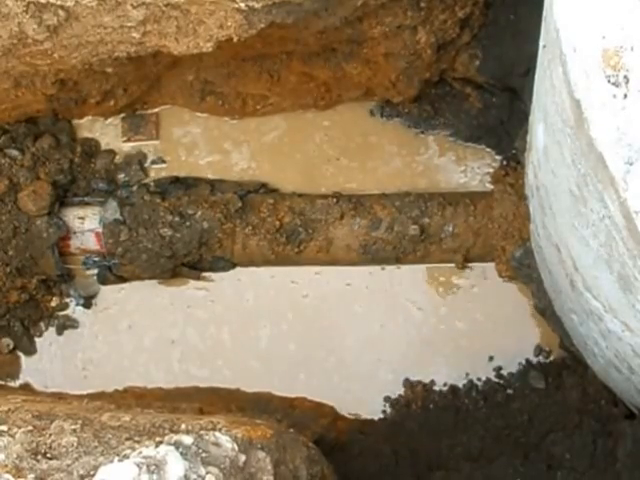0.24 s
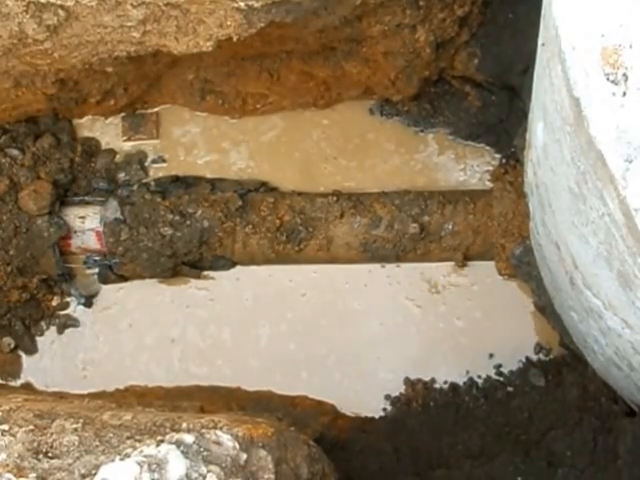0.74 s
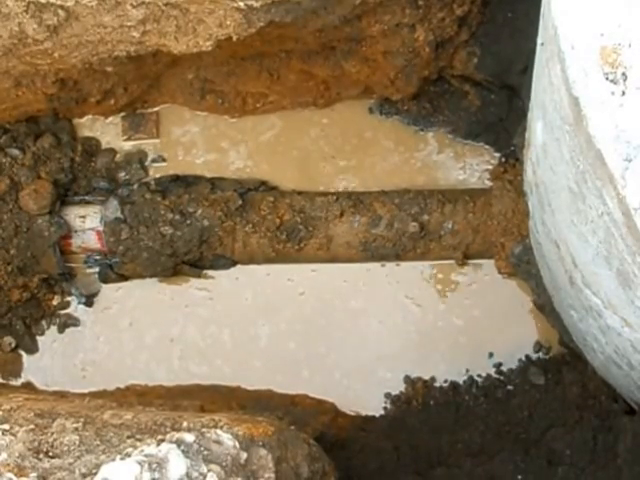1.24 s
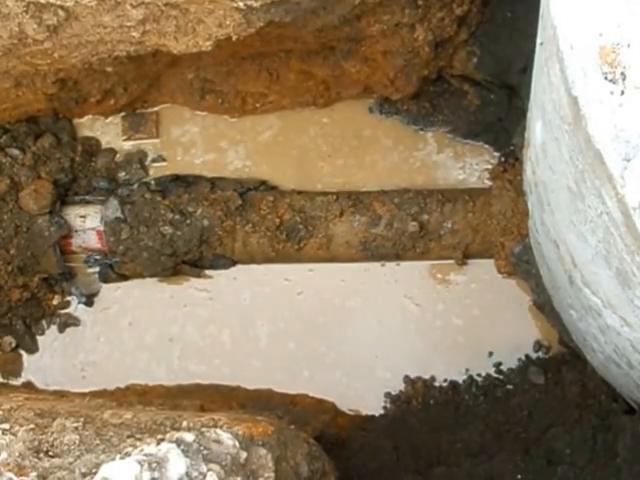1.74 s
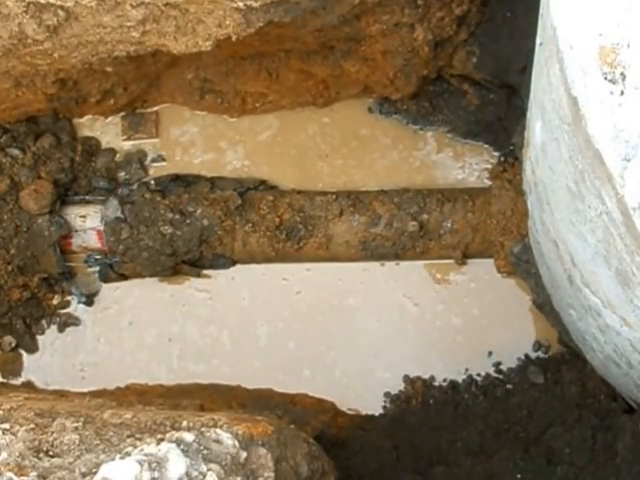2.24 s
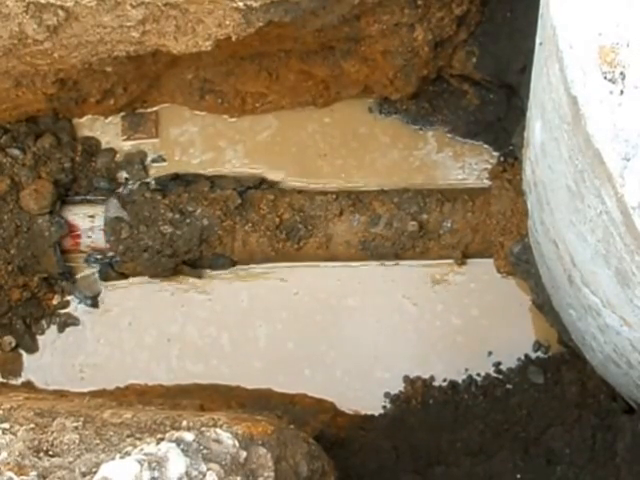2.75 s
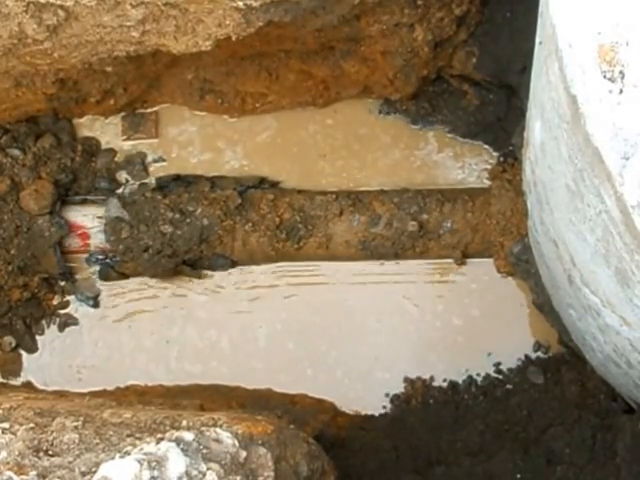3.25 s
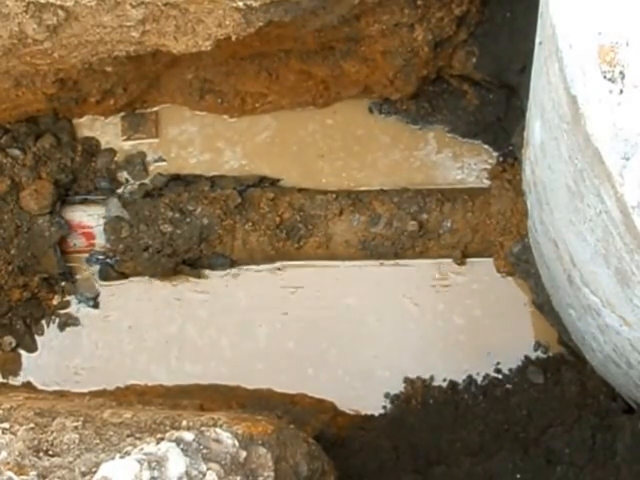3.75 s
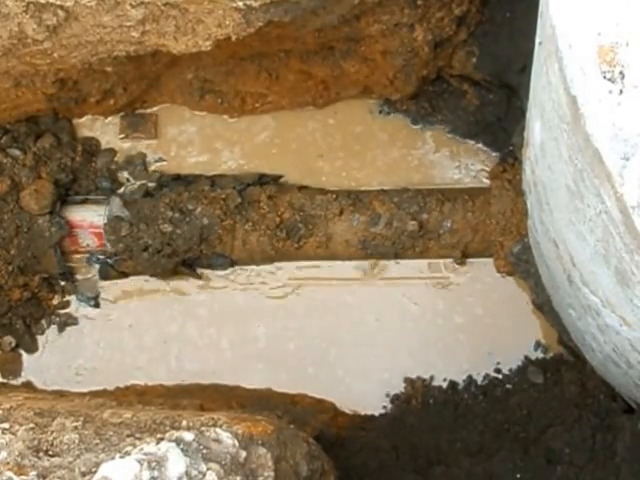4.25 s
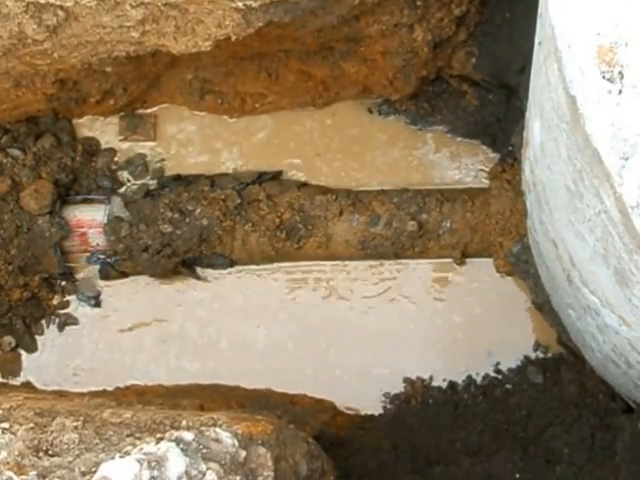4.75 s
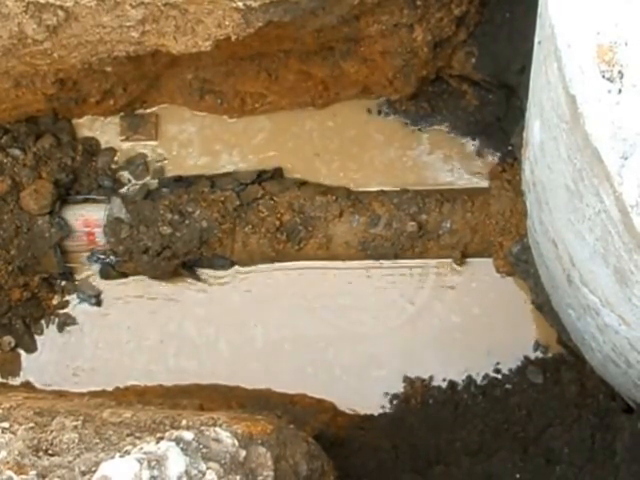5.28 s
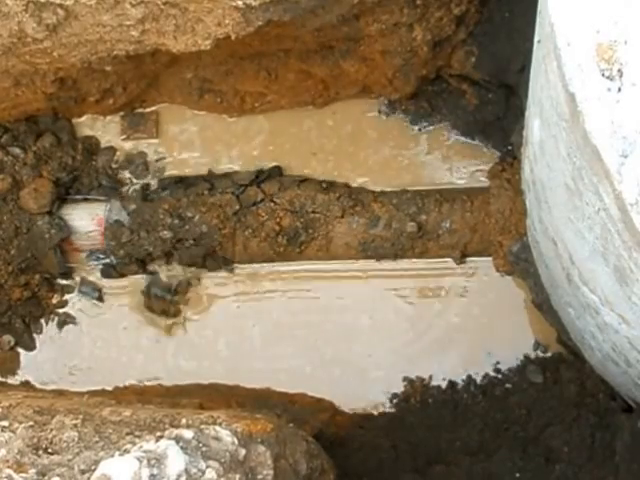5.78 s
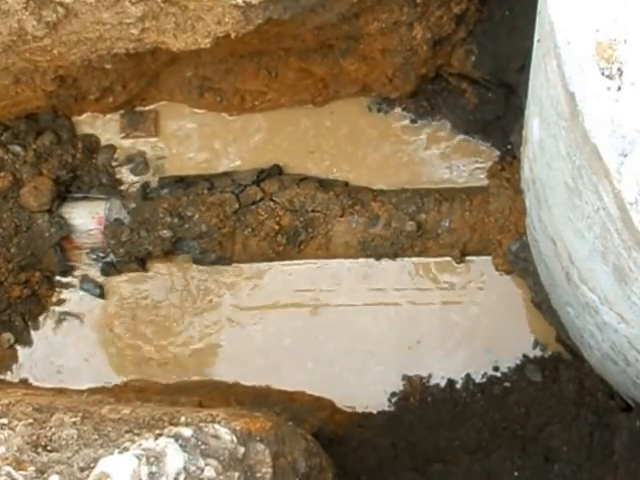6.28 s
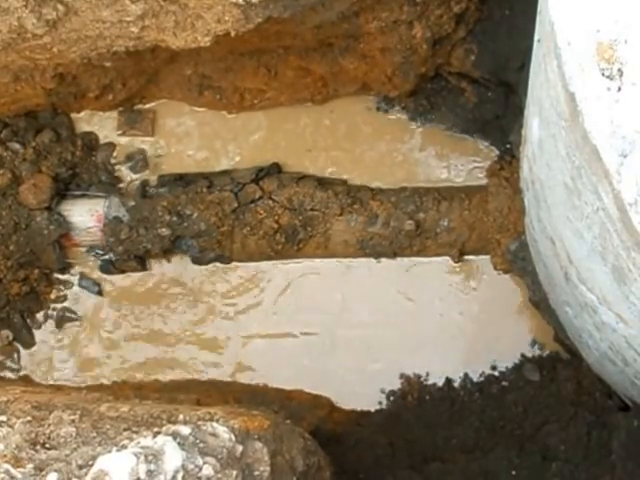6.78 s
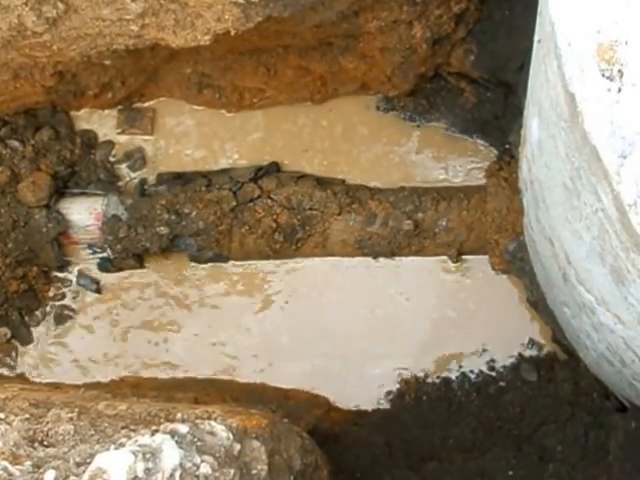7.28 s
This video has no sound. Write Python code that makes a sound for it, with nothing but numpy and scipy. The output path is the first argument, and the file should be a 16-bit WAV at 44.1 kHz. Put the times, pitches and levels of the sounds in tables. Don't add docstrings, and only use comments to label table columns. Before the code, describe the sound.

A diesel power pack drones throughout, a low buzzing hum near 50 firings a second with rough exhaust and steady fan hiss, its pitch sagging slightly under load. For the first 2.2 seconds it is nearly alone, with thin valve hisses and tiny ticks near 1.0, 1.15 and 1.7. A dull shift and crumbling lead to a huge sharp double crack with a deep thump at 2.7. Smaller snaps and grinding follow from 3.1, thickening to a hard crack at 4.03 and another at 4.57. Irregular breaks continue at 5.0, 5.4 and 5.52, then a dense cluster from 5.6 to 5.9. Light chips click until 6.2, soft crunches and a thud come around 6.5, and a watery knock with valve puffs at 7.15. Close, dry trench sound with faint earth-wall echoes; the engine dips after loud breaks and creeps back.

```python
import sys
import numpy as np
from scipy import signal
from scipy.fft import rfft, irfft, next_fast_len
from scipy.io import wavfile
from scipy.ndimage import uniform_filter1d, map_coordinates

SR = 44100
rng = np.random.default_rng(int(sys.argv[2]) if len(sys.argv) > 2 else 0)


def convert_level_to_amplitude(level_db):
    exponent = np.asarray(level_db, float) / 20
    return 10 ** exponent


def unload_audio(sound):
    columns = np.transpose(np.atleast_2d(sound))
    steps = np.round(np.clip(columns, -1, 1) * 32767)
    wavfile.write(sys.argv[1], SR, steps.astype(np.int16))


N = 331660

# frequency in Hz, level in dB.
SNAP_SPECTRUM = [(500, -23.5), (1000, -19), (1600, 11), (2200, 2.5), (2800, 5), (3400, 6), (4000, 2),
                 (5200, 5), (6500, 0.5), (8000, -5.5), (9000, -29.5)]
# start in seconds, peak in dB, bore thud in dB over the peak,
# wall knock in dB over the peak, t60 in seconds.
MAIN_BREAKS = [(2.6762, -5.5, -6, -5, 0.094), (2.7048, -.5, -8, -3, 0.033),
               (3.1488, -21.5, -4.5, -16, 0.042), (3.3977, -16.5, -2, -17, 0.089),
               (3.616, -19.5, -16, 1, 0.035), (3.704, -15.5, -13.5, -29, 0.068),
               (3.732, -11.5, -7.5, -5.5, 0.055), (5.8703, -10, -17, -33, 0.075),
               (3.9049, -15, 4.5, -14, 0.063), (3.934, -11.5, -4, -8, 0.042), (4.0297, -.5, -5.5, -5, 0.01),
               (4.5342, -22, -21, -12, 0.049), (4.566, 2.5, -15, -7, 0.049),
               (4.8098, -9.5, -10.5, -6.5, 0.037), (4.8999, -13, -15.5, -4, 0.043),
               (4.9978, -14.5, -5.5, -13.5, 0.054), (5.375, -11.5, 0, 2.5, 0.047),
               (5.5173, -3.5, -10, -1, 0.03), (5.6398, -11, -1.5, -5, 0.044),
               (5.7086, -14.5, 3, -6.5, 0.065), (5.7501, -12, -16, -3, 0.044),
               (5.7924, -15, -8.5, -6, 0.13), (5.8269, -15, -5.5, -19, 0.076), (5.8412, -3, -7, -6, 0.046)]


def unit(x):
    return x / np.sqrt(np.mean(x ** 2) + 1e-20)


def along(points, hz):
    f, value = np.transpose(points)
    return np.interp(np.log(hz + 1), np.log(f + 1), value)


def wobble(rate):
    knots = rng.standard_normal(int(N * rate / SR) + 4)
    return map_coordinates(knots, [np.arange(N) * rate / SR])


def filtered(x, response):
    length = x.shape[-1]
    m = next_fast_len(length + 8192)
    return irfft(rfft(x, m) * response(np.fft.rfftfreq(m, 1 / SR)), m)[..., :length]


def resonant(modes):
    def response(f):
        return sum((-1) ** k * convert_level_to_amplitude(db) * 1j * f * width / (hz * hz - f * f + 1j * f * width)
                   for k, (hz, width, db) in enumerate(modes))
    return response


def rush(spectrum, patchy_db):
    z = signal.stft(rng.standard_normal(N), nperseg=512)[2]
    field = uniform_filter1d(rng.standard_normal(z.shape), size=6, axis=0)
    field = uniform_filter1d(field, size=10, axis=1)
    noise = signal.istft(z * convert_level_to_amplitude(patchy_db * unit(field)), nperseg=512)[1][:N]
    return unit(filtered(noise, lambda hz: convert_level_to_amplitude(along(spectrum, hz))))


def add(track, s, sound):
    part = track[max(round(s * SR), 0):][:len(sound)]
    part += sound[:len(part)]


def ducking():
    from_db, per_db, most_db = -6.5, 1.22, 24
    in_s, out_s = 0.064, 0.74
    t = np.arange(N) / SR
    need = np.zeros(N)
    for s, db, *_ in MAIN_BREAKS:
        after = np.maximum(t - s, 0)
        need += per_db * max(db - from_db, 0) * np.exp(-after / out_s) * (1 - np.exp(-after / in_s))
    return -most_db * np.tanh(need / most_db)


def engine():
    # time in seconds, firing rate in Hz.
    speed = [(0, 48.1), (0.379, 47.74), (.55, 51.81), (.8, 52.17), (0.919, 50.83), (1.722, 50.35),
             (2.069, 46.88), (2.343, 46.82), (2.489, 50.7), (2.911, 49.89), (5.901, 49.9), (6.053, 47.94),
             (6.259, 44.22), (6.492, 50.1), (6.76, 51.6), (7.138, 50.14), (7.33, 44.4), (7.52, 44.9)]
    # centre in Hz,
    # offset in Hz for the first dB lost, steepness (exponent), top level in dB.
    silencer = [(94.45, 3, 2.1, -39.5), (132.5, 7, 2.18, -41), (204, 10.5, 4, -37.5)]
    # multiple of the firing rate, level in dB, gain in dB per dB of load.
    weak_orders = [(1, -55.5, -4), (5, -57.5, -0.7), (6, -50, -2.5), (7, -54, 0), (8, -52.5, -3.1),
                   (9, -62.5, 0.7), (10, -53.5, 3.5), (11, -61, 5.5), (12, -54.5, 0.8)]
    # frequency in Hz, level in dB per Hz.
    roar_spectrum = [(15, -31.5), (25, -13.5), (49, -29.5), (108, -8.5), (151, -12.5), (195, -6.5),
                     (253, -7.5), (437, -11.5), (493, -8.5), (659, -15.5), (852, -14), (1500, -23),
                     (1950, -27.5), (3300, -120)]
    # frequency in Hz, level in dB per Hz.
    hiss_spectrum = [(650, -30.5), (1100, -4.5), (1720, -8), (1900, 0), (2530, -7), (2750, -4.5),
                     (4060, -10), (4370, -7.5), (6240, -10), (7610, -11.5), (7930, -4), (10300, -45.5),
                     (17400, -120)]
    unloaded_hz, load_db_per_hz = 51.46, 0.2971

    firing_hz = np.interp(np.arange(N) / SR, *np.transpose(speed))
    duck_db = ducking()
    load_db = load_db_per_hz * (unloaded_hz - firing_hz)
    roar_db = -38.5 + load_db + duck_db
    hiss_db = -49 + 0.5 * load_db + 0.25 * duck_db
    phase = 2 * np.pi * np.cumsum(firing_hz) / SR

    def tone(order, db):
        level = np.sqrt(2) * convert_level_to_amplitude(db + 0.35 * wobble(23))
        return level * np.sin(order * phase + 0.13 * wobble(17) + rng.uniform(0, 6.18))

    lines = np.zeros(N)
    for order, (hz, width_hz, steepness, db) in enumerate(silencer, start=2):
        loss_db = np.abs((order * firing_hz - hz) / width_hz) ** steepness
        lines += tone(order, db + duck_db - loss_db)
    for order, db, grows in weak_orders:
        lines += tone(order, db + roar_db + 39 + grows * load_db)

    throb = np.cos(phase)
    roar = convert_level_to_amplitude(roar_db + 0.39 * throb + 0.6 * wobble(8)) * rush(roar_spectrum, patchy_db=-1.23)
    hiss = convert_level_to_amplitude(hiss_db + 2.13 + 0.31 * throb + 0.52 * wobble(12)) * rush(hiss_spectrum, patchy_db=0.6)
    return lines + roar + hiss


def leaks():
    # start in seconds, length in seconds, frequency in Hz, width in Hz, level in dB.
    hisses = [
        (.04, .3, 4600, 250, -56),
        (.975, .035, 4600, 350, -54),
        (.98, .03, 2750, 200, -52),
        (1.53, .12, 4600, 250, -54),
        (2.17, .1, 6600, 600, -57),
        (7.08, .05, 6400, 700, -57),
        (7.1, .16, 4500, 300, -60),
        (7.19, .07, 1200, 200, -46),
        (7.24, .045, 6500, 900, -54),
    ]
    out = np.zeros(N)
    for s, length, hz, width_hz, db in hisses:
        swell = np.hanning(round(length * SR * 1.4)) ** 0.5
        narrow = lambda f: resonant([(hz, width_hz, 0)])(f) ** 2
        add(out, s, convert_level_to_amplitude(db) * swell * unit(filtered(rng.standard_normal(len(swell)), narrow)))
    return out


def rings(table, glide, attack):
    out, t = np.zeros(N), np.arange(SR // 4) / SR
    for s, db, hz, t60 in table:
        envelope = convert_level_to_amplitude(db - 60 * t / max(t60, 0.003)) * (1 - np.exp(-t / attack))
        add(out, s, envelope * np.sin(2 * np.pi * hz * (t + glide * t * t)))
    return out


def whips():
    # start in seconds, peak in dB, frequency in Hz, t60 in seconds.
    instants = [(.988, -40, 2800, .03), (.999, -34.5, 4600, 0.022), (1.012, -39.5, 2750, 0.035),
                (1.151, -34, 3400, 0.021), (1.1565, -23, 6980, 0.0055), (1.1566, -27, 5600, 0.0054),
                (1.1565, -25, 4260, .006), (1.157, -30, 2280, .008), (2.705, -6.5, 3400, 0.011),
                (3.704, -27, 3300, .02), (2.7053, -5, 800, .014), (2.7068, -7, 620, .03),
                (2.7063, -5, 5200, .006), (2.735, -20, 3500, .012), (2.7355, -23, 5500, .01),
                (4.5355, -20, 4900, .012), (4.5048, -24, 5400, .01), (4.5685, -8, 1600, .012),
                (5.517, -12, 3500, .007), (3.733, -22, 1950, 0.032), (4.0297, -1, 720, 0.007),
                (4.0298, -5.5, 5000, 0.0069), (4.0298, -14, 3100, 0.0059), (4.5662, -5, 2300, 0.008),
                (4.5664, -10.5, 5500, .01), (4.5718, -11.5, 800, 0.017), (5.8412, -9, 3300, .008),
                (5.8414, -6.5, 6000, 0.0041), (5.8432, -8, 600, 0.02)]
    return rings(instants, glide=0.1, attack=0.00015)


def cracks():
    # start in seconds, peak in dB,
    # wall knock in dB over the peak, brightest frequency in Hz.
    splits = [(2.617, -24, -4, 3250), (2.702, -12, -11.5, 5900), (2.7416, -12, -20, 5650),
              (2.788, -32.5, -20, 5040), (2.824, -22.5, -13.5, 1870), (2.9223, -24.5, -25, 4220),
              (3.1174, -19.5, -2.5, 2150), (3.1838, -25, -8, 2290), (3.2322, -25.5, -19, 3080),
              (3.249, -22.5, -4, 2900), (3.495, -25, -3, 2230), (4.1382, -28.5, -22, 1910),
              (4.29, -34.5, -8.5, 6000), (4.31, -32, -18, 4420), (4.365, -28.5, -12, 2010),
              (4.5048, -20.5, -8.5, 2030), (5.0754, -28, -22, 5400), (5.1591, -25.5, 2, 1690),
              (5.254, -24, -6, 5030), (5.4403, -29.5, 3, 1650), (5.922, -22.5, -11.5, 3700),
              (6.0484, -28, -19, 1985), (6.2832, -29, -23, 4600), (6.351, -35, 0.5, 5030),
              (6.442, -26, 1.5, 2050), (6.4996, -33, 5.5, 2560), (6.5236, -29.5, 7, 3160)]
    # start in seconds, peak in dB, brightest frequency in Hz.
    flakes = [(0.998, -31, 4580), (1.157, -30.5, 3700), (1.6978, -27, 2780), (2.5397, -26, 2849),
              (3, -28, 3330), (3.4686, -24, 3460), (3.523, -22, 3700), (3.5797, -20, 1970),
              (3.6766, -29, 1630), (3.8175, -21.5, 1630), (4.2211, -26, 4445), (4.4314, -22, 2055),
              (4.4622, -22.5, 5900), (4.7104, -29, 2009), (4.8762, -21.5, 5050), (5.041, -20, 5360),
              (5.0977, -23.5, 2750), (5.2738, -25, 1917), (6.462, -23.5, 6400), (5.6203, -17.5, 2170),
              (3.8762, -23.5, 5400), (5.945, -23.5, 5400), (6.0048, -19.5, 3063), (6.024, -16.5, 4404),
              (6.0727, -25, 5370), (6.1028, -20.5, 6930), (6.133, -24.5, 4470), (6.1782, -30, 5540),
              (6.2233, -33, 3030), (6.594, -27, 6530)]
    events = [(*row, 2260) for row in MAIN_BREAKS]
    events += [(s, db, -3, knock_db, 0.059, hz) for s, db, knock_db, hz in splits]
    events += [(s, db, -23.5, -14, 0.063, hz) for s, db, hz in flakes]
    return events


def fractures():
    # frequency in Hz, width in Hz, level in dB.
    wall_modes = [(557, 180, -2), (922, 310, -0.5), (1200, 1060, -7.5)]
    # frequency in Hz, width in Hz, level in dB.
    bore_modes = [(200, 100, 2), (320, 87.5, 4), (490, 170, -6)]
    rise_s, rise_slows = 0.0002, 0.65
    front, front_grows, front_t60 = 1.8, 0.23, 0.0063
    clump_db = 2.5
    out, t = np.zeros(N), np.arange(SR // 5) / SR
    crest = lambda x: x / np.abs(x).max()
    for s, db, thud_db, knock_db, t60, bright_hz in cracks():
        breaks = rng.standard_normal((3, len(t)))
        clumps = uniform_filter1d(rng.standard_normal((3, len(t))), size=60, axis=1)
        breaks = breaks * convert_level_to_amplitude(clump_db * unit(clumps))

        def shape(lag, slow, rise):
            late = np.maximum(t - lag, 0)
            return convert_level_to_amplitude(-60 * late / (slow * max(t60, 0.01))) * (1 - np.exp(-late / rise))

        def colour(f):
            return convert_level_to_amplitude(along(SNAP_SPECTRUM, f)) * (1 + resonant([(bright_hz, 0.2 * bright_hz, 4)])(f))

        snap = filtered(breaks[0], colour) * shape(0, 1, rise_s * convert_level_to_amplitude(-rise_slows * db))
        snap *= 1 + front * convert_level_to_amplitude(front_grows * db - 60 * t / front_t60)
        knock = filtered(breaks[1], resonant(wall_modes)) * shape(0.00071, 1.4, 0.0018)
        thud = filtered(breaks[2], resonant(bore_modes)) * shape(0.0013, 2.25, 0.0034)
        mix = crest(snap) + convert_level_to_amplitude(knock_db + 1.5) * crest(knock) + convert_level_to_amplitude(thud_db + 1.5) * crest(thud)
        add(out, s, convert_level_to_amplitude(db - 4) * mix)
    return out


def trench(x):
    lags, signs = rng.uniform(0.005, 0.041, 8), rng.choice([-1, 1], 8)
    echo = np.zeros(SR // 20)
    echo[(lags * SR).astype(int)] = signs * convert_level_to_amplitude(-250 * lags)
    return signal.fftconvolve(x, echo)[:N]


def grinding():
    # start in seconds, length in seconds,
    # grit in dB, body in dB.
    grinds = [(2.293, .07, -49.5, -32), (2.592, 0.16, -41, -49), (2.679, 0.014, -23.5, -14.5),
              (2.74, 0.015, -32, -33), (2.688, .01, -30, -26), (2.72, .018, -35, -28),
              (3.92, .018, -31, -30), (4.594, .014, -38, -32), (4.522, .02, -37, -38),
              (2.999, .014, -42, -40), (3.335, .025, -40, -38), (3.4, .02, -41, -40),
              (3.61, .015, -42, -38), (5.872, .016, -38, -36), (4.06, .014, -40, -36),
              (2.904, 0.067, -44.5, -37), (2.991, 0.041, -38.5, -30.5), (3.243, 0.027, -37.5, -32.5),
              (3.117, 0.024, -35.5, -31), (3.312, .045, -42, -33), (3.422, 0.017, -46.5, -30.5),
              (3.511, 0.018, -44.5, -30), (3.582, 0.044, -40.5, -36), (3.719, 0.028, -34.5, -31.5),
              (3.857, 0.055, -36.5, -37.5), (3.903, 0.045, -26.5, -28), (3.996, 0.048, -33, -30.5),
              (4.033, 0.042, -28, -22), (4.432, .018, -40, -41), (4.491, 0.062, -35.5, -32),
              (4.557, 0.046, -36, -26.5), (4.873, 0.023, -38.5, -35), (4.992, 0.034, -31.5, -28.5),
              (5.16, 0.02, -36.5, -38.5), (5.365, 0.072, -42, -39), (5.518, 0.042, -24, -25),
              (5.632, 0.039, -33, -34.5), (5.706, 0.041, -25.5, -24.5), (5.847, 0.042, -34, -25.5),
              (6.368, 0.08, -43, -44), (6.497, 0.081, -42.5, -34.5), (7.159, 0.054, -47.5, -29.5)]
    # start in seconds, length in seconds, grit in dB, body in dB.
    stroke = (3, 3, -49.5, -47.5)
    # frequency in Hz, level in dB.
    body_spectrum = [(110, -34), (190, 2), (330, 7.5), (600, -3.5), (1200, -9.5), (2000, -38.5)]
    slide_in, slide_out = 0.15, 0.48
    t = np.arange(N) / SR
    edge = lambda u: 0.5 + 0.5 * np.tanh(u)

    def slide(s, length, lag):
        start = edge((t - s - lag) / (slide_in * length))
        return start * edge((s + length + lag - t) / (slide_out * length))

    def crumbs(spectrum, lumpy_db):
        return unit(convert_level_to_amplitude(lumpy_db * wobble(260)) * rush(spectrum, patchy_db=1.4))

    grit, body = np.zeros(N), np.zeros(N)
    for s, length, grit_db, body_db in grinds + [stroke]:
        grit += convert_level_to_amplitude(grit_db) * slide(s, length, 0)
        body += convert_level_to_amplitude(body_db) * slide(s, length, 0.0047)
    return grit * crumbs(SNAP_SPECTRUM, lumpy_db=3.5) + body * crumbs(body_spectrum, lumpy_db=0.5)


def thumps():
    # start in seconds, peak in dB, frequency in Hz, t60 in seconds.
    shifts = [(2.309, -24, 429.5, 0.1), (2.704, 3.5, 221, 0.06), (2.7075, -2, 390, .05),
              (2.703, -8, 150, .09), (4.031, -10, 380, .04), (5.52, -10, 390, .06), (5.843, -9, 380, .04),
              (2.726, -15, 350, .05), (2.683, -15, 146, 0.05), (2.75, -7.5, 320, 0.045),
              (4.03, -15.5, 129, 0.2), (4.571, -15, 824, 0.025), (3.912, -12.5, 291, 0.12),
              (4.033, -4, 213.3, 0.096), (4.605, -19, 280, .06), (5.0, -4, 514, 0.017),
              (3.13, -21.5, 240, 0.13), (3.255, -22.5, 270, 0.095), (3.42, -19, 303.8, 0.072),
              (3.73, -15, 277, 0.076), (4.05, -14, 238, 0.16), (5.38, -12, 488, 0.076),
              (5.521, -15.5, 167, 0.36), (5.5175, -2, 235, 0.065), (5.378, -15, 250, .06),
              (4.608, -17, 350, .03), (2.694, -9, 300, .03), (5.715, -15, 300, .08),
              (5.548, -18, 340, 0.09), (5.895, -15, 185, 0.13), (5.8015, -18, 215, .13),
              (5.844, -3, 191, 0.1), (6.444, -25, 462, 0.073), (6.539, -13.5, 218, 0.12),
              (6.541, -15, 132, 0.098), (7.15, -14.5, 207, 0.055), (7.212, -15, 184, 0.077),
              (7.229, -17, 204, 0.048), (7.214, -24.5, 322, 0.11)]
    return rings(shifts, glide=-0.039, attack=0.0033)


def shards():
    # start in seconds, level in dB,
    # frequency in Hz, t60 in seconds.
    rattles = [(5.708, -22, 600, .1), (2.6765, -17, 6130, .04), (2.700, -10.5, 5340, 0.039),
               (2.7035, -10, 807, 0.02), (2.707, -14, 1820, 0.063), (2.734, -29.5, 3450, 0.041),
               (2.747, -19.5, 6270, 0.027), (3.147, -25, 3200, 0.033), (3.151, -28.5, 1810, 0.047),
               (3.4, -33.5, 2750, 0.11), (3.88, -22, 5280, 0.031), (3.91, -29, 6050, 0.036),
               (3.922, -26.5, 4430, 0.092), (3.927, -20, 1520, 0.077), (4.039, -18, 4530, 0.045),
               (4.066, -23, 1880, 0.052), (4.238, -39, 4470, 0.033), (4.287, -36, 850, 0.058),
               (4.29, -42, 5700, .04), (4.434, -30, 5460, 0.055), (4.455, -46.5, 4960, 0.025),
               (4.471, -34, 4800, 0.044), (4.523, -31, 1110, 0.071), (4.533, -27.5, 4700, 0.034),
               (5.138, -31, 800, 0.073), (4.63, -39, 650, .25), (4.67, -41, 786, .35),
               (5.018, -36, 5020, 0.043), (5.075, -37, 7000, 0.072), (5.187, -33.5, 900, 0.044),
               (5.28, -36, 1900, 0.089), (5.375, -20, 5100, 0.037), (5.378, -26, 843, 0.15),
               (5.401, -31, 4560, .06), (5.464, -35.5, 4530, .05), (5.5175, -12.5, 6000, 0.0099),
               (5.52, -27.5, 800, .1), (5.556, -21, 640, 0.1), (5.553, -32.5, 4560, 0.054),
               (5.641, -23, 604, 0.06), (5.841, -11.5, 770, 0.028), (5.846, -15, 1860, 0.067),
               (5.872, -22.5, 614, 0.13), (6.352, -47, 1200, 0.073), (6.39, -38, 940, 0.2),
               (6.455, -34, 750, .2), (6.53, -34, 890, 0.1), (6.522, -38, 2500, .2), (6.598, -35, 890, .15),
               (7.175, -38, 2200, .15),
               (5.709, -22, 3400, .04), (5.716, -25, 2700, .05), (5.751, -24, 3550, .045),
                 (5.868, -20, 620, .08), (4.598, -33, 5200, .04), (2.742, -17, 5600, .035),
                 (4.569, -14, 1100, .045), (5.519, -15, 600, .06), (6.49, -36, 1500, .2),
                 (3.93, -24, 2800, .05), (4.035, -29, 1500, .12), (2.745, -21, 620, .05),
                 (5.827, -24, 480, .05), (6.54, -27, 470, .07), (2.315, -32, 780, .12), (6.4, -35, 500, .3)]
    width_per_hz, rise_per_t60 = 0.41, 0.037
    out, t = np.zeros(N), np.arange(SR // 5) / SR
    for s, db, hz, t60 in rattles:
        t60 = max(t60, 0.01)
        narrow = lambda f: resonant([(hz, width_per_hz * hz, 0)])(f) ** 2
        shape = convert_level_to_amplitude(-60 * t / t60) * (1 - np.exp(-t / (rise_per_t60 * t60)))
        add(out, s, convert_level_to_amplitude(db) * shape * unit(filtered(rng.standard_normal(len(t)), narrow)))
    return out


def chips():
    # start in seconds, peak in dB, frequency in Hz, t60 in seconds.
    drops = [(3.9345, -7, 4820, 0.011), (3.935, -13, 5460, 0.013), (4.011, -11, 4870, 0.012),
             (4.997, -14, 5260, 0.011), (5.752, -18, 1200, 0.054), (5.753, -19, 1970, 0.035),
             (5.992, -39.5, 1365, 0.13), (6.048, -33, 1980, 0.044), (6.104, -16, 7500, 0.01),
             (6.223, -37, 3000, 0.038), (6.522, -31, 1014, 0.083), (7.157, -20, 1256, 0.093),
             (7.16, -17, 1294, 0.024), (7.173, -24.5, 1144, 0.091), (7.174, -28, 1533, 0.042),
             (7.174, -32, 3060, 0.036)]
    return rings(drops, glide=0.37, attack=0.00075)


def scene():
    pipe = fractures() + grinding() + thumps()
    pipe = filtered(pipe, lambda hz: (1j * hz / (90 + 1j * hz)) ** 2)
    pipe = pipe + convert_level_to_amplitude(-16.5) * trench(pipe)
    return (engine() + leaks() + whips() + pipe + shards() + chips())[None]


def band_limit(x):
    return signal.sosfilt(signal.butter(12, 8080, fs=SR, output="sos"), x)


def record(dry):
    top_hz = 7682
    band = lambda hz: 1j * hz / (70 + 1j * hz) / np.sqrt(1 + (hz / top_hz) ** 80)
    x = np.clip(filtered(dry, band) + 0.002, -1.12, 1.12)
    return band_limit(x)


dry = scene()
out = record(dry)
unload_audio(out)
```